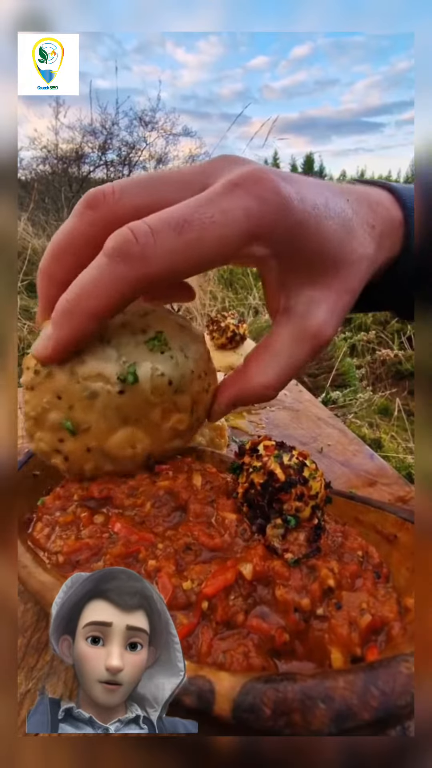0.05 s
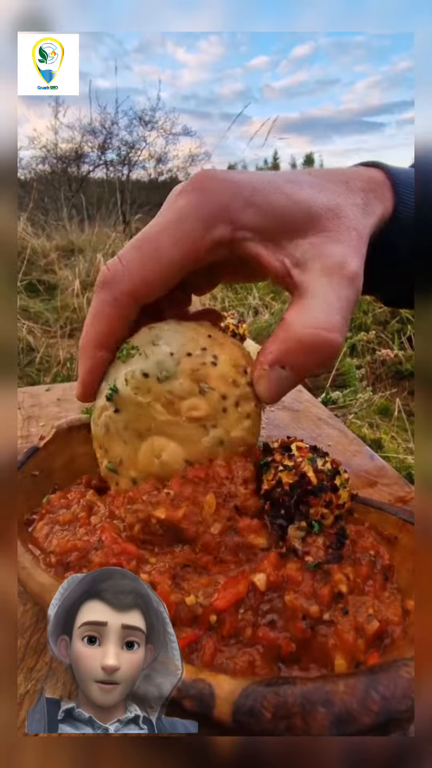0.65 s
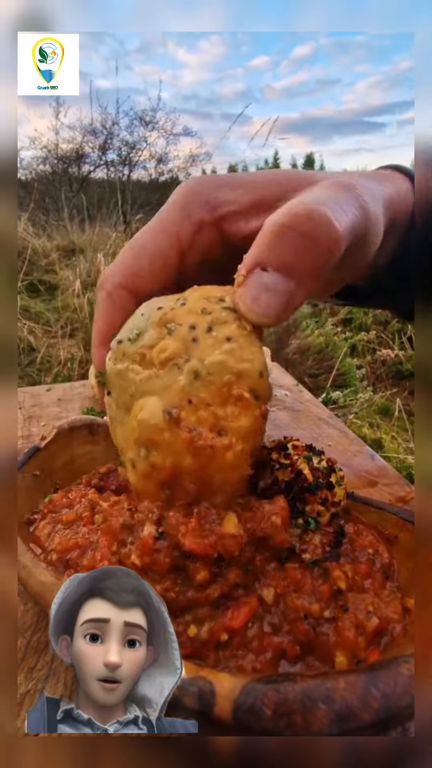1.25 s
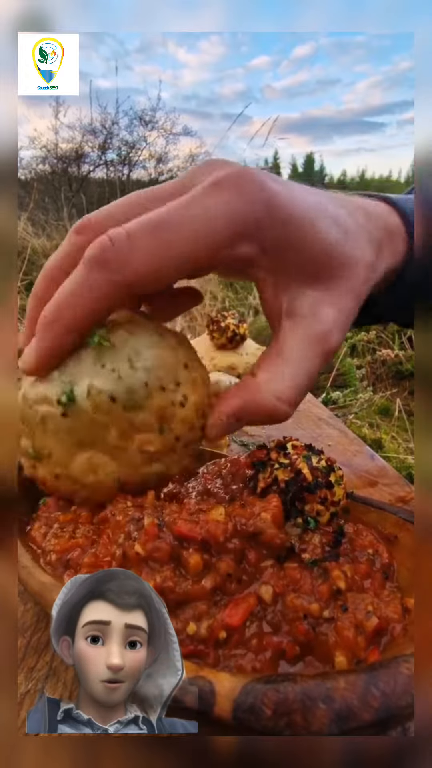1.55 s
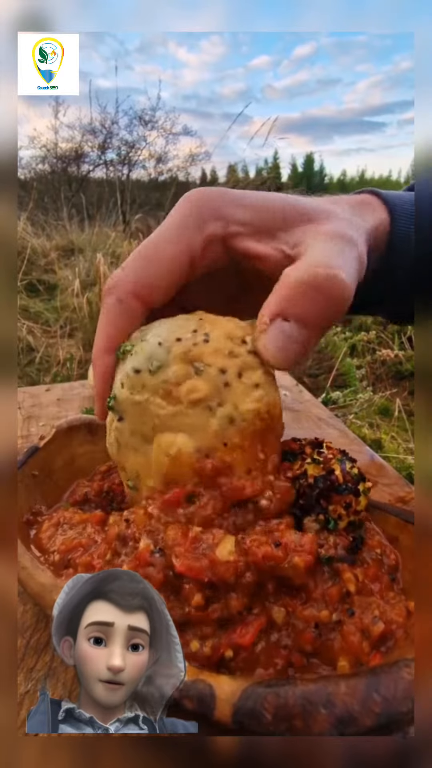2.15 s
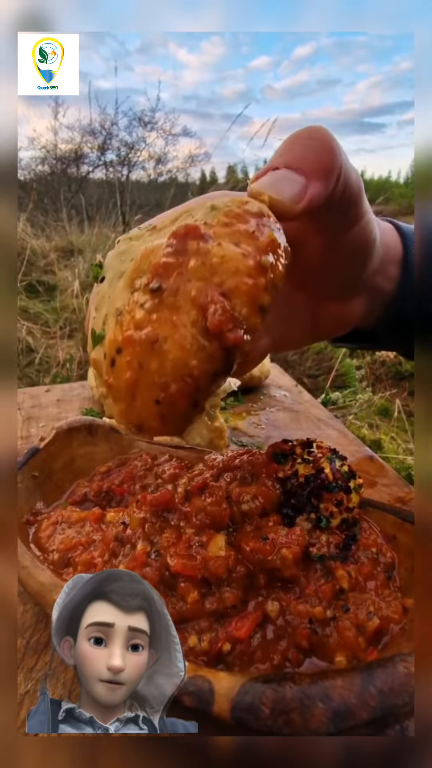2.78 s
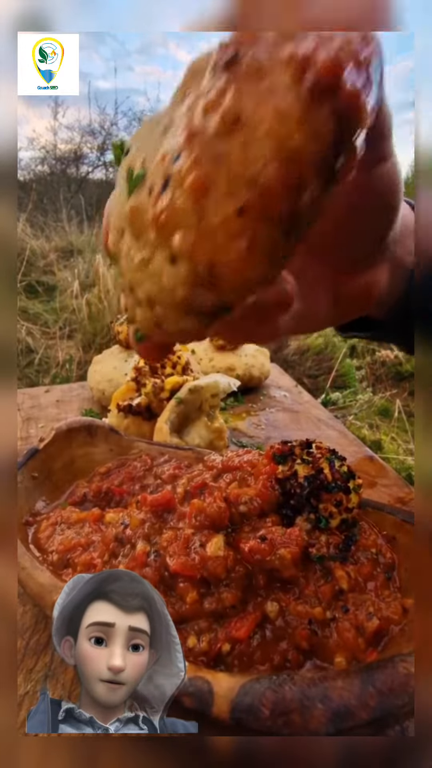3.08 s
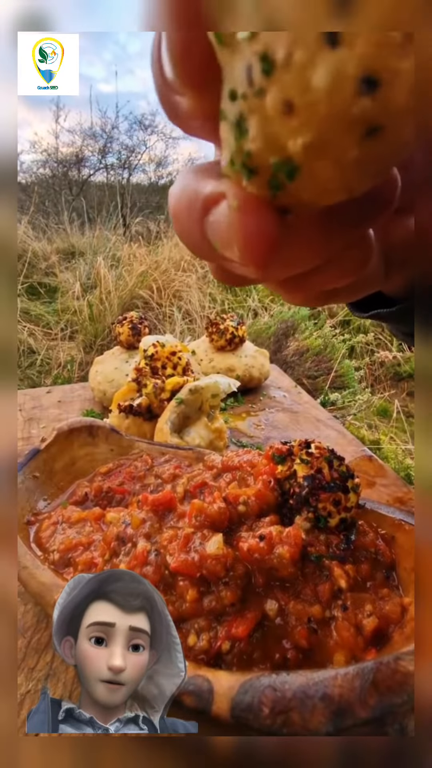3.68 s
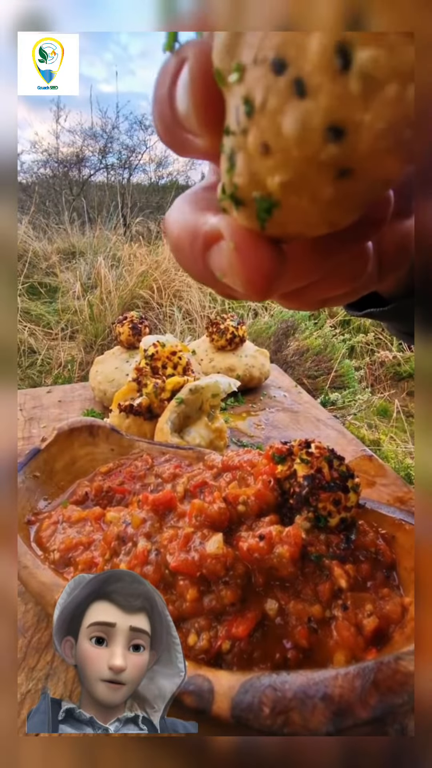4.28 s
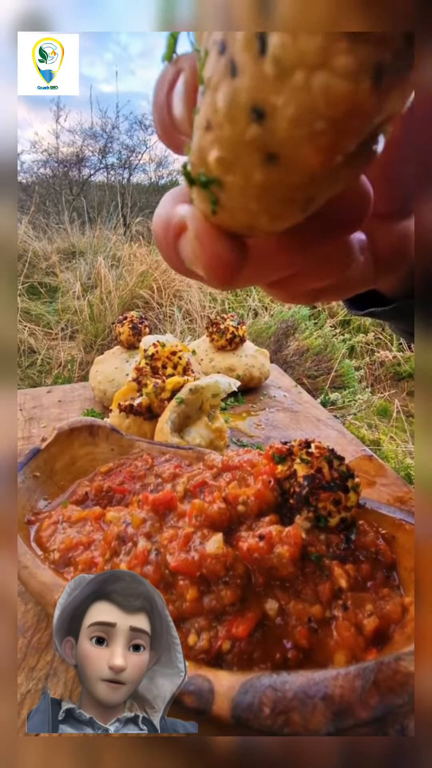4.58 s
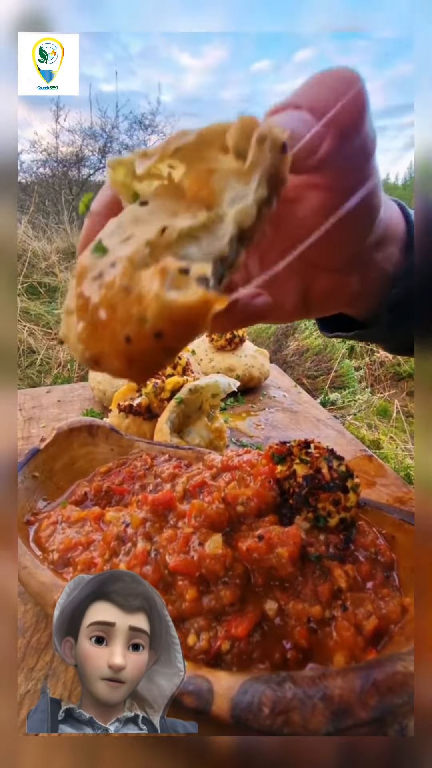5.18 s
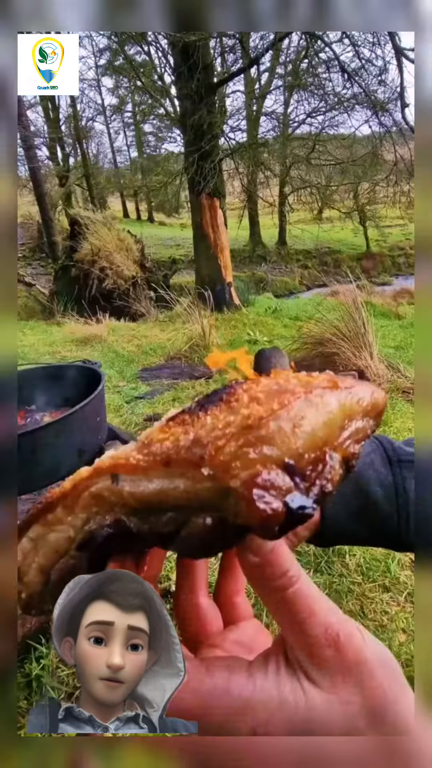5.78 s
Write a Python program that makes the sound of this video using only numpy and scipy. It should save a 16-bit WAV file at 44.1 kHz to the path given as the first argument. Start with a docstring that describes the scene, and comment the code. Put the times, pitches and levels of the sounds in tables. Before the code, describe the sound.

A crusty dumpling is dipped in thick sauce with faint squelches, and the wooden bowl knocks once on a board. Then comes a bite right beside the microphone: one long, loud crunch full of tiny crackles and sharp cracks, followed by lighter tears and sticky ticks as the piece pulls away. Low wind, distant birds and a very faint stream lie underneath.

```python
"""A crunchy bite outdoors

A crusty dumpling is dipped in a wooden bowl of sauce, which knocks once on the board.
It is bitten close by: one long crunch through dry crust into soft crumb, made of many
tiny fractures and some big cracks, then short, lighter tears as the piece comes away.
Underneath are a low uneven rumble of air, the faint rush of a stream and far birds."""
import sys
import numpy as np
from scipy import signal
from scipy.fft import rfft, irfft, next_fast_len
from scipy.io import wavfile
from scipy.ndimage import uniform_filter1d

SR = 44100
rng = np.random.default_rng(int(sys.argv[2]) if len(sys.argv) > 2 else 0)


def waveform_to_disk(signal):
    """Save audio, clipped to [-1, 1], as 16-bit WAV at the path in sys.argv[1]."""
    frames = np.transpose(np.atleast_2d(signal))
    scaled = np.clip(frames, -1, 1) * 32767
    samples = np.round(scaled).astype(np.int16)
    wavfile.write(sys.argv[1], SR, samples)


N = 257103
TIME = np.arange(N) / SR


# Pressure on the crust. Each row: time in seconds, crackle level in dB.
BITE_PRESSURE = [(3.571, -66), (3.596, -39), (3.655, -41), (3.68, -38.5), (3.723, -46.5), (3.81, -41.5),
                 (3.95, -41), (4.06, -40.5), (4.2, -45.5), (4.28, -45.5), (4.35, -49), (4.412, -40.5),
                 (4.46, -73)]
# Pockets of crumb cave in. Each row: start in seconds, length in seconds, level in dB.
CRUMB_COLLAPSES = [(3.595, 0.017, -62), (3.675, 0.035, -47.5), (3.81, 0.012, -43), (3.832, 0.025, -38.5),
                   (3.96, 0.022, -43), (4.05, 0.048, -38.5), (4.1, 0.023, -44), (4.37, 0.0063, -38),
                   (5.223, 0.017, -56), (5.32, 0.043, -56), (5.675, 0.028, -53)]
def crunch():
    """One pressure drives crackle, crumb and splinters; the splinters thin out once the shell breaks."""
    s, db = np.transpose(BITE_PRESSURE)
    crackle = from_db(np.interp(TIME, s, db, left=-np.inf, right=-np.inf))
    collapses = swells(CRUMB_COLLAPSES, attack_s=0.0037, release_s=0.01)
    crumb = np.hypot(crackle * from_db(-9.5), collapses)
    through_s, fade_s = 3.882, 0.091
    through = (1 + np.tanh((TIME - through_s) / fade_s)) / 2  # 0 in the dry shell, 1 in the moist inside
    splinters = crackle * from_db(7.5 - 10.5 * through)
    dry_walls = fractures(per_s=900, spread_db=2.6, t60=0.02, even_s=0.03)
    return crumbling(dry_walls, crackle * from_db(3), crumb * from_db(-1.5), splinters * from_db(-2),
                     flake_db=-10.5)


# Big breaks. Each row: start in seconds, peak in dB, ring in Hz, thump in dB relative to the peak,
# length in seconds.
BIG_CRACKS = [(3.584, -43, 3200, -14, 0.03), (3.5924, -22, 7800, -8.5, 0.048),
              (3.604, -11.5, 7570, -16, 0.034), (3.611, -10.5, 3740, -27, 0.036),
              (3.628, -23, 3360, -31, 0.021), (3.6403, -13.5, 5400, -44, 0.074),
              (3.651, -16.5, 3770, -26, 0.02), (3.6648, -11.5, 3300, -37, 0.024),
              (3.671, -21, 7300, -16, 0.066), (3.687, -20.5, 5500, -29, 0.033),
              (3.712, -23.5, 5250, -12, 0.015), (3.719, -29, 5400, -24, 0.0068),
              (3.7451, -20.5, 8500, -13, 0.049), (3.7497, -20.5, 7500, -34, 0.026),
              (3.762, -16.5, 5550, -18.5, 0.016), (3.788, -23.5, 8900, -6.5, 0.037),
              (3.8103, -17.5, 2520, -18.5, 0.036), (3.831, -24.5, 7500, -6, 0.061),
              (3.842, -21.5, 2930, -13.5, 0.013), (3.855, -23, 2020, -9, 0.011),
              (3.922, -24.5, 4380, -7, 0.016), (3.9497, -23.5, 4250, -9, 0.019),
              (3.974, -33.5, 5340, 1, 0.011), (4.005, -29, 5200, -23, 0.018),
              (4.03, -23.5, 4870, -9, 0.016), (4.056, -11, 5300, -18, 0.015),
              (4.0574, -16.5, 3270, -8.5, 0.07), (4.0722, -20, 3300, -10, 0.074),
              (4.123, -22, 4840, -27, 0.025), (4.149, -26, 3300, -20, 0.012), (4.172, -28, 5500, -22, 0.02),
              (4.199, -25, 5390, -11.5, 0.031), (4.259, -31, 5100, -30, 0.0049),
              (4.2766, -24, 5100, -34, 0.029), (4.29, -19.5, 5060, -38, 0.008),
              (4.3, -22.5, 4900, -15, 0.034), (4.3286, -28.5, 4800, -9.5, 0.011),
              (4.359, -30, 3150, -2, 0.008), (4.3719, -20.5, 3220, -7, 0.022),
              (4.393, -21, 3200, -8.5, 0.017), (4.404, -24.5, 3070, -26, 0.015),
              (5.3085, -29, 3660, -13, 0.024), (5.345, -29, 3300, -23, 0.011)]
def cracks(level_db, low_db):
    """Large pieces of crust give way; each also thumps the crumb."""
    out = np.zeros((2, N))
    for s, db, hz, _, length in BIG_CRACKS:
        crack = snap(hz, width_hz=360, length=length, rise_s=0.00063, ring_db=-3, alike=1, grit_db=8)
        add(out, s, from_db(db + level_db) * crack)
    s, db, _, thump_db, _ = np.transpose(BIG_CRACKS)
    thumps = noise_pair(alike=0.99) * dying(clicks(s, db + thump_db + low_db), t60=0.037)
    tone = [(300, -14), (1300, -21.5), (2800, -6.5), (8300, -6.5), (10000, -24.5), (15000, -18)]
    return colour(out, tone) + shaped(thumps, CRUMB_TONE)


# The piece pulls away. Each row: start in seconds, length in seconds, crackle in dB, crumb in dB.
LIGHT_TEARS = [(4.407, 0.035, -57, -62.5), (4.515, 0.05, -60, -69.5), (4.617, 0.15, -61, -76),
               (5.025, 0.044, -73.5, -63), (5.18, 0.089, -61, -59.5), (5.284, 0.087, -53.5, -61.5),
               (5.4, 0.084, -58, -58), (5.638, 0.07, -60, -59), (5.762, 0.068, -64.5, -56.5)]
def tears():
    """Each tear is a short swell of crackle and crumb, while the broken crust keeps crackling faintly."""
    s, length, crackle_db, crumb_db = np.transpose(LIGHT_TEARS)
    attack_s, release_s = 0.023, 0.3
    settling = from_db(-74.5) * (TIME > s[0])
    crackle = np.hypot(settling, swells(zip(s, length, crackle_db), attack_s, release_s))
    crumb = np.hypot(settling / 2, swells(zip(s, length, crumb_db), attack_s, release_s))
    moist_walls = fractures(per_s=1400, spread_db=3.6, t60=0.021, even_s=0.06)
    tearing = crumbling(moist_walls, crackle * from_db(5), crumb * from_db(-2), crackle * from_db(2),
                        flake_db=-11.5)
    return colour(tearing, [(300, 9), (750, -4), (950, 4.5), (1800, 4), (3200, 2.5), (4500, -2),
                            (8000, -4.5), (12000, -7)])


# The tone of crust, soft crumb and fine splinters. Each row: frequency in Hz, level in dB.
CRUST_TONE = [(900, -14.5), (1200, -9), (1700, -6), (2300, -2), (2800, -4), (3250, 2.5), (3750, -8),
              (4050, 0.5), (4400, -2.5), (5300, 1), (6000, -5), (7000, -11.5), (9300, -18.5)]
CRUMB_TONE = [(40, -8), (120, -3), (250, -1.5), (420, 2), (540, -3), (690, -0.5), (790, 6.5), (940, -1),
              (1200, -6.5), (1600, -5.5), (2400, -26)]
SPLINTER_TONE = [(5000, -31), (6500, 6), (8300, 3), (9300, -3.5), (10500, -4), (13000, 1), (15500, -8)]
def crumbling(grains, crackle_gain, crumb_gain, splinter_gain, flake_db):
    """The same tiny fractures sound in the crust, in its splinters and, longer, in the soft crumb."""
    thud = rms_one(dying(grains, t60=0.0035))
    spray = rms_one(grains + thud)
    ringing = from_db(flake_db) * flakes(per_s=900, cycles=50, spread_db=3.5)
    crisp = rms_one(shifting(noise_pair(alike=0.51)) * grains + ringing)
    crust = shaped(crisp * crackle_gain, CRUST_TONE)
    crumb = shaped(noise_pair(alike=0.85) * thud * crumb_gain, CRUMB_TONE)
    splinters = shaped(shifting(noise_pair(alike=0.049)) * spray * splinter_gain, SPLINTER_TONE)
    return crust + crumb + splinters


def fractures(per_s, spread_db, t60, even_s):
    """Loudness curve of random tiny breaks, many small and a few large, evened out over even_s."""
    sizes = from_db(spread_db * np.minimum(rng.exponential(1, N), 4))
    envelope = dying(sizes * (rng.random(N) < per_s / SR), t60)
    return envelope / np.sqrt(uniform_filter1d(envelope ** 2, int(even_s * SR)) + 1e-6)


def flakes(per_s, cycles, spread_db):
    """Loose flakes click and ring briefly, each at a pitch picked by chance."""
    size, chance, sign, pick = rng.random((4, N))
    strength = from_db(spread_db * np.minimum(-np.log(1 - size), 3))
    hits = strength * np.sign(sign - .5) * (chance < per_s / SR)
    pitches = np.geomspace(1800, 9000, 28)
    pick = (pick * len(pitches)).astype(int)
    rings = np.zeros((2, N))
    for k, hz in enumerate(pitches):
        side_gains = from_db(rng.normal(0, 3.4, (2, 1)))
        rings += side_gains * hz * ring(hits * (pick == k), hz, cycles / hz)
    return rms_one(rings)


def shifting(x, patchy_db=3.5, rate_hz=14):
    """The pieces keep changing size, so each quarter octave swells and fades on its own."""
    size = next_fast_len(N)
    spectrum = rfft(x, size)
    hz = np.maximum(np.arange(size // 2 + 1) * SR / size, 1)
    place = np.clip(4 * np.log2(hz / 1000), 0, 14)  # quarter octaves above 1000 Hz
    bands = (irfft(spectrum * np.maximum(1 - abs(place - k), 0), size)[:, :N] for k in range(15))
    return rms_one(sum(band * from_db(patchy_db * np.clip(drift(rate_hz), -2, 2)) for band in bands))


# The hollow of the mouth. Each row: frequency in Hz, boost or cut in dB.
MOUTH_TONE = [(520, 0), (690, 6), (775, 5.5), (865, -17), (935, -15), (1040, 0)]
def mouth(x):
    """The mouth around the breaking piece makes it sound hollow."""
    return colour(x, MOUTH_TONE)


# How close sounds lean to one side. Each row: frequency in Hz, left minus right in dB at full lean.
SIDE_LEAN = [(100, 0), (380, 8), (800, 2), (950, 7.5), (1200, 2), (1550, 7.5), (2250, 7.5), (2750, -9.5),
             (3300, -6.5), (4400, 0), (5500, 5.5), (6600, 5.5), (8200, 22.5), (10300, 12), (14000, 14)]
def beside_microphone(x, lean, turn_hz, width_hz):
    """The right opening of the microphone is mostly shaded, and its wave flips over near turn_hz."""
    left = colour(x[0], [(hz, lean * db / 2) for hz, db in SIDE_LEAN])
    right = colour(x[1], [(hz, -lean * db / 2) for hz, db in SIDE_LEAN])
    r = np.exp(-np.pi * width_hz / SR)
    poles = np.array([1, -2 * r * np.cos(2 * np.pi * turn_hz / SR), r * r])
    return np.array([left, signal.lfilter(poles[::-1], poles, right)])


# Small snaps of crust and sauce. Each row: start in seconds, peak in dB, ring in Hz,
# length in seconds, treble limit in Hz.
SMALL_TICKS = [(1.728, -48, 4500, 0.028, 9050), (1.99, -47, 4500, 0.014, 9000),
               (2.927, -45, 3300, 0.045, 4930), (2.95, -29.5, 1690, 0.0059, 3500),
               (2.951, -34.5, 3200, 0.008, 4800), (2.9515, -37.5, 5470, 0.0061, 5800),
               (3.086, -51, 8100, 0.16, 9000), (3.133, -35.5, 4100, 0.014, 9100),
               (3.158, -45.5, 3400, 0.014, 7000), (3.183, -45.5, 9000, 0.037, 10100),
               (3.512, -30, 1170, 0.08, 3050), (4.5137, -33, 3080, 0.02, 7750),
               (4.558, -42, 3200, 0.017, 12000), (4.608, -40.5, 3000, 0.035, 8900),
               (4.62, -34, 2170, 0.015, 8950), (4.6555, -37.5, 2200, 0.01, 8900),
               (4.715, -37, 2360, 0.009, 8000), (4.729, -36, 2270, 0.0091, 8000),
               (4.763, -33.5, 2310, 0.022, 9000), (4.7746, -29, 2360, 0.024, 9000),
               (4.9317, -34, 3600, 0.0095, 10000), (4.943, -37.5, 2160, 0.015, 7000),
               (4.981, -48, 5600, 0.0073, 8000), (5.012, -38, 2940, 0.0065, 5000),
               (5.046, -38.5, 3030, 0.008, 5000), (5.2, -45, 3230, 0.01, 8050),
               (5.257, -30, 3430, 0.027, 10000), (5.263, -29.5, 3350, 0.023, 10000),
               (5.313, -36, 3300, 0.023, 15000), (5.323, -37, 13200, 0.16, 17000),
               (5.44, -41, 2560, 0.0077, 7000), (5.487, -43, 3220, 0.01, 7000),
               (5.64, -32.5, 3040, 0.0066, 9000), (5.643, -35, 3080, 0.013, 9000),
               (5.6782, -33.5, 2470, 0.009, 6850), (5.687, -36, 2540, 0.051, 7000),
               (5.7256, -37.5, 4300, 0.011, 12000)]
def ticks(level_db):
    """Sticky films and single flakes part with small sharp ticks; the moist ones are duller."""
    out = np.zeros((2, N))
    for s, db, hz, length, top_hz in SMALL_TICKS:
        tick = snap(hz, width_hz=0.2 * hz, length=length, rise_s=0.0003, ring_db=0, alike=0.85, grit_db=6)
        dulling = signal.butter(2, top_hz, fs=SR, output="sos")
        add(out, s, from_db(db + level_db) * signal.sosfilt(dulling, tick))
    return colour(out, [(400, -12), (950, -18.5), (1400, -8), (2400, -3), (3200, 1), (4200, -1.5),
                        (5400, 4.5), (8300, 3.5), (10000, -14), (13500, 0)])


def snap(hz, width_hz, length, rise_s, ring_db, alike, grit_db):
    """A brief run of uneven breaks rings one flake; the peak is about 1."""
    t = TIME[:SR // 10]
    noise = rng.standard_normal((4, len(t)))  # shared, left, right, grit
    envelope = from_db(grit_db * np.minimum(noise[3], 2) - 60 * t / length) * (1 - np.exp(-t / rise_s))
    burst = (np.sqrt(alike) * noise[0] + np.sqrt(1 - alike) * noise[1:3]) * envelope
    ringing = ring(burst, hz, t60=np.log(1000) / np.pi / width_hz)
    sound = rms_one(burst) + from_db(ring_db) * rms_one(ringing)
    peak_power = uniform_filter1d(np.mean(sound ** 2, axis=0), SR // 500).max()
    return sound / np.sqrt(peak_power) / 2


# Moist pockets of crumb pop open. Each row: start in seconds, level in dB.
CRUMB_POPS = [(5.2252, -37), (5.2353, -39.5), (5.6407, -30.5), (5.6446, -34.5), (5.6773, -43), (5.698, -60),
              (5.727, -39.5)]
# Their hollow knock. Each row: pitch in Hz, level in dB, ring time in seconds.
POCKET_RINGS = [(239, -10, 0.012), (414, -1.5, 0.023), (710, -10, 0.027), (1260, -9, 0.01)]
def pops(level_db):
    """Each pocket opens with a single soft pulse that rings the hollow around it."""
    s, db = np.transpose(CRUMB_POPS)
    pulses = clicks(s, db + level_db)
    knock = sum(from_db(ring_db) * ring(pulses, hz, t60) for hz, ring_db, t60 in POCKET_RINGS)
    return knock * from_db([[.5], [-.5]])


# The soft inside and the sauce are squashed. Each row: start in seconds, level in dB.
SOFT_SQUASHES = [(0.571, -46.5), (0.618, -47), (2.323, -45.5), (2.793, -52.5), (2.825, -43.5), (3.508, -40)]
def squashes(level_db):
    """The moist inside gives way with soft, dull puffs of noise."""
    s, db = np.transpose(SOFT_SQUASHES)
    bursts = noise_pair(alike=0.95) * dying(clicks(s, db + level_db), t60=0.051)
    return shaped(bursts, [(40, -28), (250, 16), (430, 11.5), (590, 7.5), (770, -14.5), (980, -18),
                           (1300, -41), (3200, -14), (5000, -55), (15000, -60)])


# The bowl rocks on the board. Each row: start in seconds, rim level in dB, body level in dB.
BOWL_KNOCKS = [(1.455, -47, -56), (1.458, -39.5, -24), (1.461, -68, -67), (1.475, -51.5, -31),
               (1.485, -57, -45)]
# The notes of its wood. Each row: pitch in Hz, level in dB, ring time in seconds.
BOWL_RINGS = [(157.8, -14, 0.24), (436, -2, 0.052), (492, -13, 0.095), (968, -15.5, 0.031),
              (1074, -23, 0.06), (2200, -29, 0.042), (2370, 5, 0.018), (3300, 5, 0.01), (4250, 11, 0.0032),
              (5140, -13, 0.038)]
def bowl(scuff_db, thud_db):
    """The rim touches first, then the weight of the bowl lands with a thud and chatters."""
    s, rim_db, body_db = np.transpose(BOWL_KNOCKS)
    rim, body = clicks(s, rim_db), clicks(s, body_db)
    wood = sum(from_db(db) * ring(body if hz < 1500 else rim, hz, t60) for hz, db, t60 in BOWL_RINGS)
    scuff = shaped(noise_pair(alike=0.72) * dying(rim, t60=0.067),
                   [(300, 13), (1700, -14), (2300, 14), (5500, 0), (8500, -5), (15000, -21)])
    thud = shaped(noise_pair(alike=0.45) * dying(body, t60=0.1),
                  [(40, -34), (90, -13), (170, 5.5), (240, -2.5), (520, -12.5), (750, -18.5),
                   (1050, -19), (2000, -33.5)])
    return (wood + from_db(scuff_db) * scuff + from_db(thud_db) * thud) * from_db([[-4], [2.5]])


# The bowl is nudged along. Each row: start in seconds, length in seconds, level in dB.
BOWL_SCRAPES = [(0.07, 0.19, -57), (0.165, 0.033, -48.5)]
# The notes of the board. Each row: pitch in Hz, base width in Hz, level in dB.
BOARD_RINGS = [(435, 34, 3), (714, 34, -10), (1042, 28, -4.5), (1460, 34, -16), (1920, 25, -22),
               (2480, 34, -9), (2900, 40, -20), (3420, 34, -16), (3860, 50, -11)]
def scrape(level_db, hiss_db):
    """Off to the right, the bowl slides over the board in tiny slips that ring the wood."""
    slips = noise_pair(alike=0.7) * fractures(per_s=3500, spread_db=1, t60=0.02, even_s=0.03)
    widen = 0.019  # each note is widened by this share of its pitch, for a smoother scrape
    wood = sum(from_db(db) * width * ring(slips, hz, t60=np.log(1000) / np.pi / (width + widen * hz))
               for hz, width, db in BOARD_RINGS)
    hiss = colour(slips, [(300, -4), (480, 12), (620, -2.5), (1700, -10.5), (2400, -2), (4000, -2),
                          (7000, -10.5), (10000, -26), (15000, -35)])
    push = from_db(level_db) * swells(BOWL_SCRAPES, attack_s=0.033, release_s=0.26)
    return push * (rms_one(wood) + from_db(hiss_db) * rms_one(hiss)) * from_db([[-5], [3.5]])


# The dumpling drags, the grip shifts. Each row: start in seconds, length in seconds, level in dB.
RUB_MOVES = [(2.33, 0.39, -73), (2.66, 0.65, -74), (3.44, 0.1, -65)]
# The tone of rubbing. Each row: frequency in Hz, level in dB.
RUB_TONE = [(150, -4), (420, 17), (600, -2.5), (760, 1.5), (900, -7), (1100, -4), (1600, -12), (2400, -2),
            (4000, -3), (7000, -15), (10000, -25), (15000, -37)]
def rubs(level_db):
    """Crust, wood and skin rub with a fine grain."""
    grain = noise_pair(alike=0.59) * fractures(per_s=9000, spread_db=4.5, t60=0.0066, even_s=0.064)
    rub = rms_one(colour(grain, RUB_TONE))
    return from_db(level_db) * swells(RUB_MOVES, attack_s=0.083, release_s=0.56) * rub


# The crust moves in the sauce. Each row: start in seconds, length in seconds, level in dB.
SAUCE_SQUELCHES = [(0.66, 0.051, -58), (1.13, 0.034, -65), (1.19, 0.052, -62), (1.34, 0.15, -66.5),
                   (1.965, 0.03, -56), (2.21, 0.028, -59)]
def squelches(level_db):
    """Tiny air pockets burst in the sauce."""
    pockets = noise_pair(alike=0.28) * fractures(per_s=370, spread_db=3, t60=0.021, even_s=0.041)
    wet = rms_one(colour(pockets, [(1500, -9.5), (4000, 3), (8500, 3), (15000, -14)]))
    return from_db(level_db) * swells(SAUCE_SQUELCHES, attack_s=0.02, release_s=0.093) * wet


# Puffs of air on the microphone. Each row: start in seconds, length in seconds, level in dB.
AIR_PUFFS = [(1.1, 0.042, -53.5), (1.66, 0.075, -57), (1.96, 0.075, -53.5), (2.4, 0.085, -55),
             (2.78, 0.054, -53.5), (3.21, 0.05, -57), (5.77, 0.079, -46)]
# The tone of their rumble. Each row: frequency in Hz, level in dB.
RUMBLE_TONE = [(12, -47.5), (20, -17.5), (41, -4.5), (86, 1.5), (117, 0.5), (182, -2), (244, -14),
               (356, -9), (408, -17), (584, -26), (782, -40.5), (1200, -55), (1560, -41.5), (2640, -120)]
def wind(level_db, lumpy_db):
    """Moving air makes a lumpy low rumble: a few puffs over a swaying draught."""
    air = colour(noise_pair(alike=0.98) * from_db(lumpy_db * drift(35)), RUMBLE_TONE)
    air = air / np.sqrt(uniform_filter1d(np.mean(air ** 2, axis=0), SR // 8))  # even out slow swings
    draught = from_db(-61.5 - 4 * drift(16.5))
    strength = np.hypot(draught, swells(AIR_PUFFS, attack_s=0.017, release_s=0.043))
    return from_db(level_db) * strength * air * from_db([[-.8], [.8]])


# The tone of the stream. Each row: frequency in Hz, level in dB.
STREAM_TONE = [(530, 0), (900, -2.5), (1690, -8.5), (3030, -2.5), (5840, -6.5), (7680, -2.5), (9070, -18.5),
               (14300, -14.5), (15500, -36)]
def stream(level_db):
    """Far water makes a nearly even hiss."""
    hiss = noise_pair(alike=0.15) * from_db(drift(7))
    return from_db(level_db) * rms_one(colour(hiss, STREAM_TONE))


# One bird's quick trills. Each row: start in seconds, length in seconds, pitch in Hz, level in dB.
BIRD_TRILLS = [(0.0, 0.061, 6870, -73), (0.318, 0.16, 7230, -72), (0.685, 0.14, 6630, -73.5),
               (0.78, 0.29, 4420, -79.5), (0.951, 0.13, 7840, -71), (1.211, 0.085, 8130, -67),
               (1.533, 0.076, 4170, -70), (1.952, 0.2, 7060, -82.5), (2.38, 0.5, 2890, -78.5),
               (5.531, 0.075, 9100, -63.5)]
# Other birds' thin whistles. Each row: start in seconds, length in seconds, first pitch in Hz,
# last pitch in Hz, level in dB.
BIRD_WHISTLES = [(0.0, 0.039, 3520, 3465, -72), (0.355, 0.035, 2774, 2674, -66.5),
                 (0.505, 0.097, 5100, 4440, -72), (0.545, 0.12, 3420, 3360, -74),
                 (1.03, 0.071, 4730, 4200, -75), (1.15, 0.075, 5400, 4550, -76),
                 (1.32, 0.063, 6100, 5100, -81), (1.565, 0.048, 2560, 2970, -72.5),
                 (1.82, 0.25, 3115, 3120, -81.5), (2.15, 0.058, 6100, 6060, -75.5),
                 (2.315, 0.041, 6330, 6100, -72.5), (2.48, 0.089, 6230, 6090, -78),
                 (2.655, 0.08, 6200, 6100, -78), (2.71, 0.19, 3620, 3390, -75.5),
                 (2.81, 0.126, 4970, 4730, -74), (2.975, 0.034, 3500, 2880, -71.5)]
def birds(level_db):
    """Far whistles and quick trills, each sliding to its end pitch, blurred by the trees."""
    trill_depth, whistle_depth, slide = 0.059, 0.012, 0.023  # shares of the pitch
    out = np.zeros((2, N))
    flutter = drift(130)
    trills = [(s, length, hz * (1 + slide), hz * (1 - slide), db) for s, length, hz, db in BIRD_TRILLS]
    for notes, depth in ((trills, trill_depth), (BIRD_WHISTLES, whistle_depth)):
        for s, length, start_hz, end_hz, db in notes:
            progress = np.linspace(0, 1, int(length * SR))
            glide = end_hz + (start_hz - end_hz) * (1 - progress) ** 2
            pitch = glide * (1 + depth * flutter[int(s * SR):][:len(progress)])
            arch = np.sqrt(4 * progress * (1 - progress))
            note = from_db(db + level_db) * arch * np.sin(2 * np.pi * np.cumsum(pitch) / SR)
            add(out, s, np.array([note, note]))
    return from_db(-7) * out + from_db(1.5) * scatter(out, t60=0.28)


def scatter(x, t60):
    """A blur of echoes from the ground and things nearby."""
    t = TIME[:SR // 2]
    tail = rng.standard_normal((2, len(t))) * from_db(-60 * t / t60)
    return signal.fftconvolve(x, rms_one(tail) / np.sqrt(len(t)), axes=1)[:, :N]


def from_db(db):
    """Turn decibels into a number to multiply by."""
    return 10 ** (np.asarray(db) / 20)


def rms_one(x):
    """Scale a sound to an average power of 1."""
    return x / np.sqrt(np.mean(x ** 2) + 1e-20)


def drift(rate_hz):
    """A smooth random wander of typical size 1."""
    step = 40  # samples between points
    r = np.exp(-2 * np.pi * step * rate_hz / SR)
    slow = signal.lfilter([1], [1, -2 * r, r * r], rng.standard_normal(N // step + 2002))[2000:]
    return np.interp(np.arange(N) / step, np.arange(len(slow)), rms_one(slow))


def colour(x, tone):
    """Filter a sound to follow (Hz, dB) points."""
    size = 16384
    hz, db = np.transpose(tone)
    grid = np.maximum(np.arange(size // 2 + 1) * SR / size, 1)
    gains = from_db(np.interp(np.log(grid), np.log(hz), db))
    cepstrum = irfft(np.log(gains))
    cepstrum[1:size // 2] *= 2  # folded forward, so nothing rings before its cause
    cepstrum[size // 2 + 1:] = 0
    response = irfft(np.exp(rfft(cepstrum)))[:size // 2]
    return signal.oaconvolve(np.atleast_2d(x), response[None], axes=1)[:, :N].reshape(x.shape)


def shaped(x, tone):
    """Colour a sound and keep its power."""
    return rms_one(colour(x, tone)) * np.sqrt(np.mean(x ** 2))


def noise_pair(alike):
    """White noise for left and right: unrelated when alike is 0, the same when it is 1."""
    mid, side = rng.standard_normal((2, N))
    return np.sqrt((1 + alike) / 2) * mid + np.sqrt((1 - alike) / 2) * side * np.array([[1], [-1]])


def ring(x, hz, t60):
    """Each click in x starts a pure note that fades by 60 dB in t60 seconds."""
    r, w = from_db(-60 / (t60 * SR)), 2 * np.pi * hz / SR
    return signal.lfilter([0, np.sin(w)], [1, -2 * r * np.cos(w), r * r], x + 1e-18)


def clicks(times, db):
    """One click at each time."""
    out = np.zeros(N)
    out[(np.asarray(times) * SR).astype(int)] = from_db(db)
    return out


def dying(hits, t60):
    """Loudness curve of hits that each fade by 60 dB in t60 seconds."""
    return np.sqrt(signal.lfilter([1], [1, -from_db(-120 / (t60 * SR))], hits ** 2 + 1e-18))


def swells(rows, attack_s, release_s):
    """Loudness curve of movements that each rise, hold, then fade by 60 dB in release_s."""
    power = 0
    for s, length, db in rows:
        age = TIME - s
        fall_db = 60 * np.clip((age - length) / release_s, 0, 2)
        power = power + (np.clip(age / attack_s, 0, 1) * from_db(db - fall_db)) ** 2
    return np.sqrt(power)


def add(out, s, sound):
    """Mix a sound in, starting at s seconds."""
    at = int(s * SR)
    out[:, at:at + sound.shape[1]] += sound[:, :N - at]


def scene():
    """Close food sounds and their faint echoes over the open-air background."""
    bite = crunch() + cracks(level_db=2.5, low_db=-6)
    bite = beside_microphone(bite, lean=0.68, turn_hz=850, width_hz=420)
    tearing = beside_microphone(tears(), lean=0.51, turn_hz=970, width_hz=520)
    close = mouth(bite + tearing) + ticks(level_db=-2) + squashes(level_db=-5) + pops(level_db=-0.5)
    close += bowl(scuff_db=-2.5, thud_db=-11.5) + scrape(level_db=-2.5, hiss_db=-3)
    close += rubs(level_db=3.5) + squelches(level_db=-10.5)
    background = wind(level_db=2, lumpy_db=4) + stream(level_db=-76) + birds(level_db=2.5)
    echoes = from_db(-13) * scatter(close, t60=.07)
    return close + echoes + background


def record(dry):
    """The very highest treble is cut steeply."""
    cutoff_hz = 15900
    return signal.sosfilt(signal.ellip(12, .1, 80, cutoff_hz, fs=SR, output="sos"), dry)


dry = scene()
out = record(dry)
waveform_to_disk(out)
```